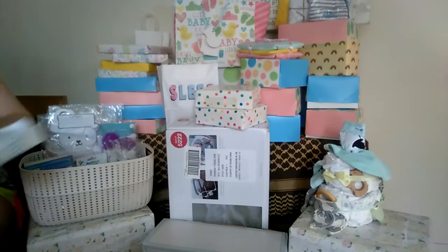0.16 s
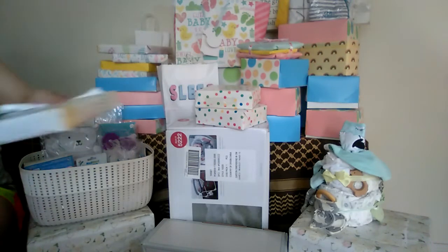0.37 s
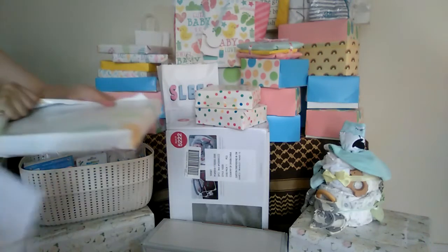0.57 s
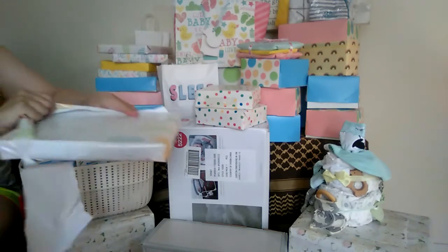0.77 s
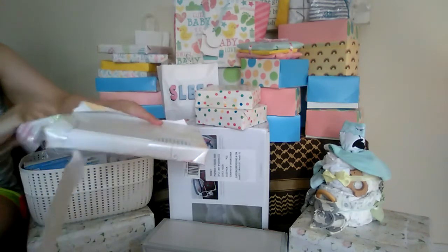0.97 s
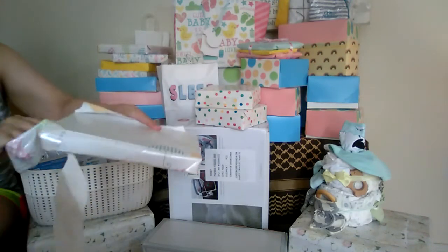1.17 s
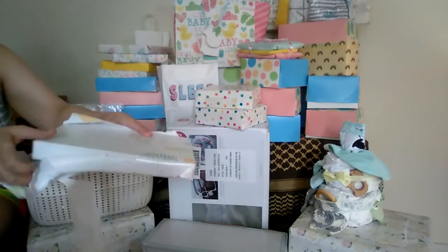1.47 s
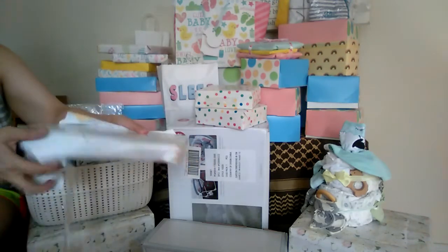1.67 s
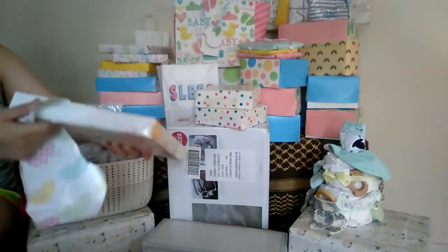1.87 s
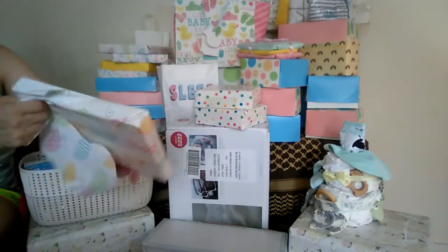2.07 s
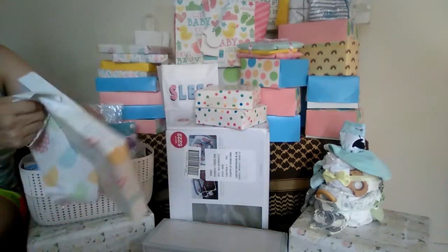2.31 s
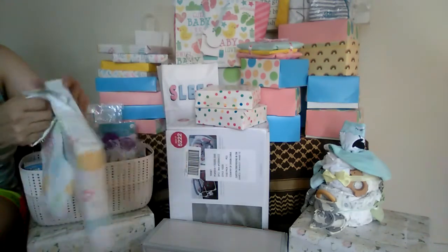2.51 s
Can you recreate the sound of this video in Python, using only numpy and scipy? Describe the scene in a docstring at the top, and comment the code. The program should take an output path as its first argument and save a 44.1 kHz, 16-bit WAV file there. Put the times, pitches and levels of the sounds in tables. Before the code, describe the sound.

Stiff wrapping paper rustles, crackles and tears as hands pull it off a cardboard box.

```python
"""Unwrapping a cardboard box

Hands pull stiff, glittery paper off a flat box, off to the left in a small bare room.
The sheet rustles in spurts of tiny clicks, creases snap, and the bumped box knocks hollowly.
The paper rips sharply once, tears twice more slowly and squeaks as it slides.
A noise suppressor turns the pauses down."""
import sys
import numpy as np
from scipy import signal
from scipy.fft import rfft, irfft
from scipy.io import wavfile
from scipy.ndimage import uniform_filter1d, minimum_filter1d

SR = 44100
rng = np.random.default_rng(int(sys.argv[2]) if len(sys.argv) > 2 else 0)


def unload_audio(sound):
    """Save the sound as a 16-bit wav file, at the path given as the first command line argument."""
    columns = np.transpose(np.atleast_2d(sound))
    # keep every value between -1 and 1, then stretch to whole-number steps
    steps = np.round(np.clip(columns, -1, 1) * 32767)
    wavfile.write(sys.argv[1], SR, steps.astype(np.int16))


N = 116865
HZ = np.fft.rfftfreq(4096, 1 / SR)


def amp(db):
    """Turns decibels into a gain."""
    return 10 ** (np.asarray(db) / 20)


def unit_power(x):
    """Scales to an average power of 1."""
    return x / np.sqrt(np.mean(x ** 2) + 1e-20)


def unit(x):
    """Scales to a total energy of 1."""
    return x / np.sqrt(np.sum(x ** 2) + 1e-20)


def curve(points, hz=HZ):
    """Joins a table's points along a pitch scale."""
    f, value = np.transpose(points)
    return np.interp(np.log(hz + 1), np.log(f + 1), value)


def add(mix, start_s, sound):
    """Mixes a sound in at a given time."""
    part = mix[max(round(start_s * SR), 0):][:len(sound)]
    part += sound[:len(part)]


def colour(x, db):
    """Gives a sound the tone of a dB curve, with no ringing ahead of a click."""
    log_gain = np.log(amp(np.r_[db, db[-2:0:-1]]))
    taps = np.fft.ifft(np.exp(np.conj(signal.hilbert(log_gain)))).real
    return signal.fftconvolve(x, unit(taps[:len(taps) // 2]))[:len(x)]


def wander(size, span_s):
    """A smooth random wobble."""
    return unit_power(uniform_filter1d(rng.standard_normal(size), int(span_s * SR)))


def facet(depth_db, step_hz=520):
    """Each facet (small flat patch) of the sheet has its own peaks and dips in tone."""
    knots = np.arange(0, SR / 2, step_hz)
    return depth_db * np.interp(HZ, knots, rng.standard_normal(128)[:len(knots)])


def crackle(per_s=500, spread_db=3.5, clump_db=2.5):
    """Tiny clicks of uneven size, swelling in clumps."""
    size_db = spread_db * np.minimum(rng.exponential(1, N), 4) + clump_db * wander(N, 0.0045)
    return unit_power(amp(size_db) * rng.choice([-1, 1], N) * (rng.random(N) < per_s / SR))


# Bursts of rustling (start [s], rise [s], length [s], crisp level [dB], body level [dB], fade [dB/s])
SPURTS = [(0, 0.0008, 0.0307, -39.5, -54, 95), (0.069, 0.00287, 0.073, -45.5, -53, 26),
          (0.149, 0.0058, 0.0798, -46.5, -50, -26.5), (0.384, 0.006, 0.0222, -47, -50, 119),
          (0.497, 0.0113, 0.03, -50.5, -54.5, 99.5), (0.655, 0.0043, 0.032, -51.5, -52, 3),
          (0.693, .01, 0.1197, -39.5, -44.5, 40), (0.888, 0.00147, 0.066, -43, -49.5, 3),
          (0.968, 0.0261, 0.0289, -26.5, -50, 32), (0.999, 0.00614, 0.0767, -24, -31.5, 116),
          (1.067, 0.0197, 0.0829, -32, -41, 97), (1.301, 0.0063, 0.104, -44, -47.5, -13),
          (1.334, 0.0501, 0.0695, -25.5, -37.5, 81.5), (1.393, 0.0063, 0.1934, -29.5, -52, 91),
          (1.595, 0.0063, 0.143, -54, -51.5, 68), (1.741, 0.0083, 0.103, -39, -47, 23),
          (1.83, 0.022, 0.0415, -32, -43, 70.5), (1.876, 0.0152, 0.214, -40, -43.5, 45),
          (2.039, 0.0097, 0.0581, -39.5, -45.5, 62), (2.143, 0.006, 0.0735, -43, -46.5, 44.5),
          (2.231, 0.0051, 0.0929, -48.5, -52.5, 32.5), (2.375, 0.006, 0.0643, -43, -51.5, 51)]
# The rustle's crisp top and its fuller body (frequency [Hz], level [dB])
RUSTLE_CRISP = [(100, -59), (2000, -15.5), (4500, -15), (7000, -9.5), (8500, -3.5), (10300, 3.5),
                (12000, -1.5), (14100, -10), (14900, -54.5), (16400, -59.5)]
RUSTLE_BODY = [(40, -17.5), (110, -14.5), (180, -4.5), (270, -9.5), (380, -0.5), (530, 4.5), (720, 5.5),
               (1200, 2.5), (2200, 3.5), (3200, 3), (5200, 1), (7500, 4.5), (11000, -17), (16000, -57.5)]

def rustle(facets=7, release_s=0.0041, turn_db=11):
    """The sheet crackles in spurts; its facets take turns as it flexes, so the tone shifts."""
    t, power, out = np.arange(N) / SR, np.zeros((2, N)), np.zeros(N)
    for start, rise, length, crisp_db, body_db, fade in SPURTS:
        age = t - start
        shape = np.clip(age / rise, 0, 1) * amp(-fade * np.clip(age - rise, 0, length))
        shape *= np.exp(-np.maximum(age - length, 0) / release_s)
        power += (amp([[crisp_db], [body_db]]) * shape) ** 2
    turns = np.array([amp(turn_db * wander(N, span_s=0.03)) for _ in range(facets)])
    for share in turns / np.linalg.norm(turns, axis=0):
        crisp, body = np.sqrt(power) * share * crackle()
        tint = facet(depth_db=5.5)
        out += colour(crisp, curve(RUSTLE_CRISP) + tint / 2) + colour(body, curve(RUSTLE_BODY) + tint)
    return out


def click(trail_s=0.000241):
    """The sheet buckles once: a spike with a ragged trail."""
    t = np.arange(256) / SR
    trail = unit(rng.standard_normal(len(t)) * np.exp(-t / trail_s) * (t > 0))
    return unit((t == 0) + 0.958 * trail)


# Creases flipping over (time [s], crisp level [dB], body level [dB])
SNAPS = [(0.069, -18, -31.5), (.135, -20.5, -44), (0.1618, -13, -30), (0.383, -18.5, -20),
         (.432, -22.5, -24.5), (0.493, -22.5, -27), (0.505, -18.5, -22.5), (0.545, -24.5, -27),
         (.612, -24.5, -28.5), (0.659, -20, -27), (0.6798, -6.5, -17), (.688, -6.5, -9), (0.7444, -9, -17),
         (0.891, -25.5, -23), (0.9564, -2.5, -4.5), (0.9591, 1, -29), (0.9806, -2, -12),
         (1.308, -30.5, -25.5), (1.353, -6.5, -13), (1.597, -21, -16), (1.6276, -26, -23.5),
         (1.662, -29, -33.5), (1.747, -8, -13), (1.7904, -6, -9), (1.838, -11, -23.5), (1.8666, -14.5, -21),
         (1.979, -14, -22), (2.0384, -1.5, -9.5), (2.0612, -15.5, -32.5), (2.1191, -17, -26),
         (2.134, -5, -10.5), (2.1377, -9.5, -36.5), (2.2186, -6.5, -12.5), (2.2271, -6.5, -22),
         (2.29, -20, -33.5), (2.298, -12.5, -29.5), (2.352, -18, -37), (2.365, -1.5, -13),
         (2.3795, -12, -22.5), (2.3862, -14, -22.5), (2.6284, -25.5, -26)]
# A snap's crisp top and its fuller body (frequency [Hz], level [dB])
SNAP_CRISP = [(100, -53), (2000, -26.5), (4500, -14), (7000, -18.5), (9000, -0.5), (10500, 6), (12000, 2),
              (14000, -8.5), (15000, -28.5), (16400, -29)]
SNAP_BODY = [(30, -40.5), (200, -15.5), (550, -1), (1200, -0.5), (2600, -2.5), (3800, 4), (5500, 2),
             (7500, 2.5), (11000, -12.5), (16000, -48.5)]

def snaps():
    """Creases flip over with thin, bright ticks, each on its own facet."""
    out = np.zeros(N)
    for time, crisp_db, body_db in SNAPS:
        snap = np.r_[click(), np.zeros(len(HZ))]
        tint = facet(depth_db=1.5)
        crisp = unit(colour(snap, curve(SNAP_CRISP) + tint))
        body = unit(colour(snap, curve(SNAP_BODY) + tint))
        add(out, time, amp(crisp_db) * crisp + amp(body_db) * body)
    return out


# Hands bumping the box (time [s], level [dB], tone centre [Hz], tone width [octaves])
KNOCKS = [(0.17, -23.5, 531, 0.5), (.235, -10, 661, 0.613), (.349, -22.5, 610, 0.96),
          (0.434, -27, 772, 0.65), (.508, -25.5, 715, 0.42), (.546, -24.5, 700, 0.674),
          (0.612, -25.5, 654, 0.73), (0.66, -27, 480, 0.95), (.7444, -25, 549, 0.92),
          (0.9567, -6.5, 520, 1.255), (1.015, -11, 516, 0.565), (1.376, -15.5, 1117, 0.51),
          (1.571, -27.5, 351, 0.564), (1.6269, -14, 1416, 0.662), (1.649, -26, 384, 0.472),
          (1.721, -20.5, 1200, 2.32), (1.752, -30.5, 188.5, 0.35), (1.763, -12, 1728, 0.446),
          (2.232, -11, 820, 1.214), (2.283, -14.5, 680, 0.886), (2.367, -21, 702, 0.6)]
# The notes the cardboard rings at (frequency [Hz], level [dB], time to fade by 60 dB [s])
BOX_NOTES = [(180, 0.5, 0.089), (318, -13.5, 0.073), (480, -5.5, 0.34), (523, 9, 0.035),
             (628.4, -4.5, 0.18), (1106, -28, 0.25), (1650, -3, 0.054)]

def knocks(scuff_s=0.00219, ring_gain=0.34, detune=0.061):
    """Each bump scuffs and rings the box. The grip shifts its notes; the spot hit sets the tone."""
    out, t = np.zeros(N), np.arange(SR // 4) / SR
    for time, db, centre_hz, octaves in KNOCKS:
        scuff = unit(rng.standard_normal(len(t)) * np.exp(-t / scuff_s))
        grip = 1 + detune * rng.uniform(-1.1, 1)
        ring = unit(sum(amp(level - 60 * t / fade_s) * np.sin(2 * np.pi * (hz * grip * t + rng.random()))
                        for hz, level, fade_s in BOX_NOTES))
        tone = -10 * np.log10(1 + (np.log2((HZ + 1) / centre_hz) / octaves) ** 6)
        knock = unit(colour(scuff, tone)) + ring_gain * unit(colour(ring, tone))
        add(out, time, amp(db) * unit(knock))
    return out


# The clicks in one quick rip (time [s], relative level [dB])
RIP_CLICKS = [(0.2338, -2.5), (.2354, 6), (.2363, 6), (0.2376, 9), (0.2391, -12), (0.2412, -10),
              (0.2415, -2.5), (0.2437, -14), (.245, -13.5)]
# The tone of its crack (frequency [Hz], level [dB])
RIP_TONE = [(20, -51), (80, -27), (300, -20), (600, -8.5), (1000, -18.5), (1700, -26), (3300, -15),
            (4800, -23), (7000, -18.5), (9000, -6.5), (10400, 0), (13000, -8), (14500, -24), (16400, -44.5)]

def rip(crack_db=11, ring_db=3.5, ring_hz=3478, width_hz=460):
    """The paper gives way in a fast run of clicks; returns the crack and the taut sheet's ring."""
    run = np.zeros(N)
    for time, db in RIP_CLICKS:
        add(run, time, amp(db) * click())
    crack = unit(colour(run, curve(RIP_TONE)))
    ring = unit(colour(run, -10 * np.log10(1 + ((HZ - ring_hz) / width_hz) ** 4)))
    return amp(crack_db) * crack, amp(ring_db) * ring


# Slower tears (start [s], length [s], level of one fibre [dB], fade [dB/s])
TEARS = [(1.011, .16, -13.5, 81.5), (1.364, 0.097, -19.5, 80.5)]

def tears(fibres_per_s=170, jitter=0.5, spread_db=2.5):
    """Fibres break one by one, unevenly, and get quieter as the pull slackens."""
    out = np.zeros(N)
    for start, length, db, fade in TEARS:
        gaps, sizes = rng.standard_normal((64, 2)).T
        ages = np.cumsum(np.exp(jitter * gaps)) / fibres_per_s
        for age, size in zip(ages, np.clip(sizes, -2, 2)):
            add(out, start + age, (age < length) * amp(db - fade * age + spread_db * size) * click())
    return colour(out, curve(SNAP_BODY))


# Paper sliding on the box (start [s], length [s], first pitch [Hz], last pitch [Hz], level [dB])
SQUEAKS = [(1.354, 0.0256, 9828, 10250, -31.5), (1.447, 0.0582, 10160, 10490, -30.5),
           (1.491, 0.0418, 10350, 10840, -38)]

def squeaks(wobble_hz=115.3):
    """The paper sticks and slips, making a thin, fuzzy whistle that creeps upward."""
    out = np.zeros(N)
    for start, length, first_hz, last_hz, db in SQUEAKS:
        progress = np.linspace(0, 1, int(length * SR))
        hz = first_hz + (last_hz - first_hz) * progress + wobble_hz * wander(len(progress), 0.001)
        tone = np.sin(2 * np.pi * np.cumsum(hz) / SR) * (1 + 0.11 * wander(len(progress), 0.001))
        add(out, start, amp(db) * unit_power(tone * np.sqrt(progress * (1 - progress))))
    return out


# How long the room rings (frequency [Hz], time to fade by 60 dB [s])
ROOM_FADE = [(100, 0.14), (500, 0.3046), (2000, 0.373), (6000, 0.373), (11000, 0.2975), (16000, 0.146)]
# How alike its left and right echoes are (frequency [Hz], likeness [0 to 1])
ROOM_LIKENESS = [(100, 1), (300, 0.987), (600, 0.652), (1200, 0.246), (16000, 0.044)]

def walls(tail_db=-5, early_db=-6, early_s=0.0118, rise_s=0.00402):
    """The walls answer a click from one spot: early echoes and a smooth tail, left and right."""
    t = np.arange(SR // 2) / SR
    hz, times, (left, other) = signal.stft(rng.standard_normal((2, len(t))), SR, nperseg=256)
    alike = np.clip(curve(ROOM_LIKENESS, hz), -1, 1)[:, None]
    right = alike * left + np.sqrt(1 - alike ** 2) * other
    fade = amp(-60 * times / curve(ROOM_FADE, hz)[:, None])
    tails = signal.istft(np.array([left, right]) * fade, SR, nperseg=256)[1][:, :len(t)]
    early = (rng.random(len(t)) < 3000 / SR) * np.exp(-t / early_s) * (t > 0.001)
    rise = np.minimum(t / rise_s, 1)
    return np.array([amp(tail_db) * unit(x * rise) + amp(early_db) * unit(x * early) for x in tails])


def room(direct, to_walls, spots=3, right_lag_s=0.00016, moves_per_s=2.4752):
    """Sound reaches the left side first; the echoes shift as the parcel moves."""
    out, t = np.zeros((2, N)), np.arange(N) / SR
    for side, lag in zip(out, (0, right_lag_s)):
        add(side, lag, amp(-4) * direct)
    for k in range(spots):
        share = np.sqrt(2 / spots) * np.cos(np.pi * (moves_per_s * t + k / spots))
        out += signal.fftconvolve((share * to_walls)[None], walls(), axes=1)[:, :N]
    return out


# Faint background rumble and hiss (frequency [Hz], relative level [dB])
BACKGROUND_TONE = [(20, -20), (40, -6), (57, 7), (80, 0), (110, -8), (200, -3), (330, -8), (520, -2),
                   (1200, -17.5), (4000, -22), (11000, -7), (14000, -14.5), (15000, -52)]

def scene():
    """Paper and box in a quiet room. Sharp sounds echo less, and the rip's ring not at all."""
    background = amp(-64.5) * colour(rng.standard_normal(N), curve(BACKGROUND_TONE))
    sliding = rustle() + squeaks()
    bumps = knocks()
    ticks = snaps() + tears()
    crack, ring = rip()
    to_walls = sliding + amp(-2) * bumps + amp(-4) * ticks + amp(-2.5) * crack
    return background + room(sliding + bumps + ticks + crack + ring, to_walls)


def suppressor(x, threshold_db=-45.5, slope=2.046, max_cut_db=12, window_s=0.00546):
    """A gain that drops as the sound falls below the threshold."""
    width = int(window_s * SR)
    level_db = 10 * np.log10(abs(uniform_filter1d((x ** 2).mean(0), width)) + 1e-12)
    cut_db = minimum_filter1d(np.clip((threshold_db - level_db) * slope, 0, max_cut_db), width)
    return amp(-uniform_filter1d(cut_db, width))


# How the two microphones differ (frequency [Hz], left level above right [dB])
MIC_BALANCE = [(100, 0), (1000, 1.5), (4000, 1), (8000, -1), (10000, -3.5), (12000, 8.5), (15000, 2)]

def record(dry, bass_hz=27, top_hz=16450):
    """Two unequal microphones, a suppressor that spares the deepest bass, and a cut of the top treble."""
    hz = np.fft.rfftfreq(2 * N, 1 / SR)
    spectrum = rfft(dry, 2 * N) * amp(curve(MIC_BALANCE, hz) * np.array([[0.5], [-0.5]]))
    heard = irfft(spectrum)[:, :N]
    bass = irfft(spectrum * np.exp(-(hz / bass_hz) ** 2))[:, :N]
    quieted = bass + (heard - bass) * suppressor(heard)
    treble_cut = signal.firwin(511, top_hz, window=("kaiser", 9), fs=SR)
    return signal.oaconvolve(quieted, treble_cut[None], "same")


dry = scene()
out = record(dry)
unload_audio(out)
```